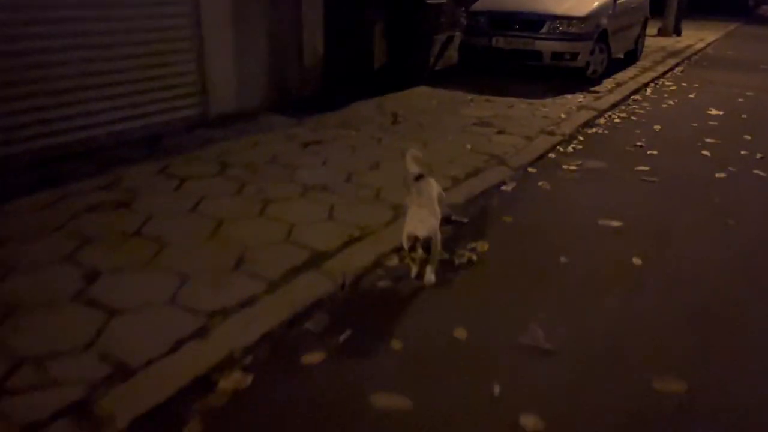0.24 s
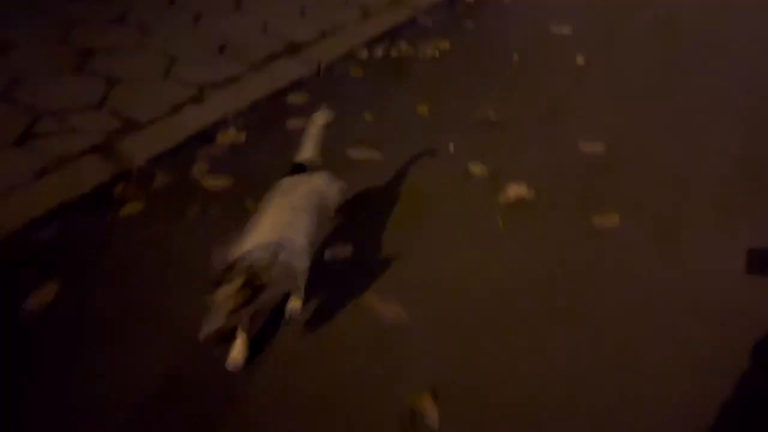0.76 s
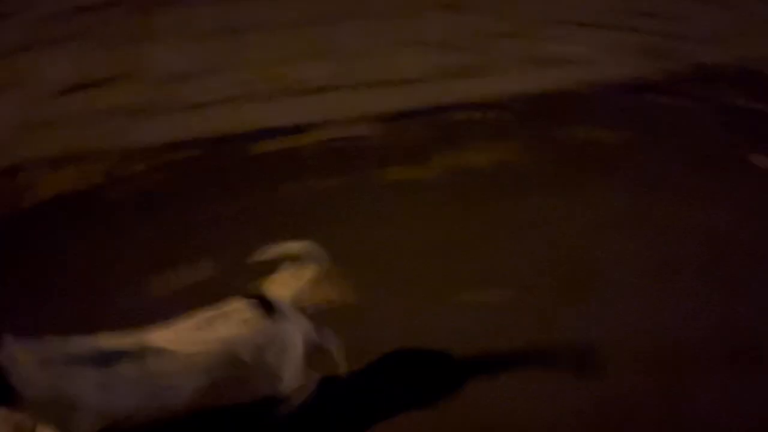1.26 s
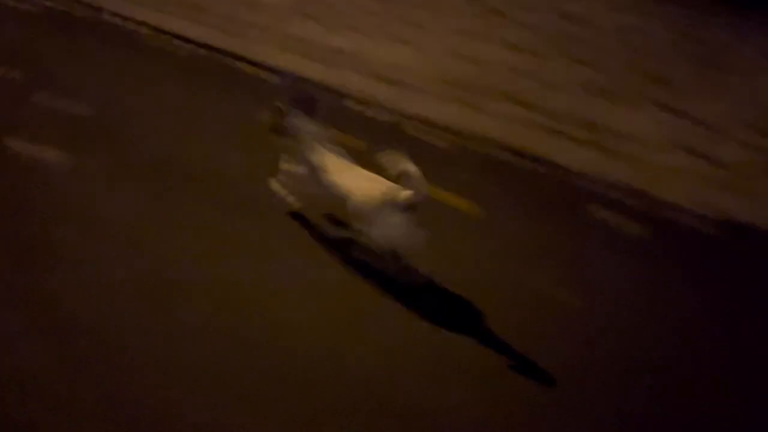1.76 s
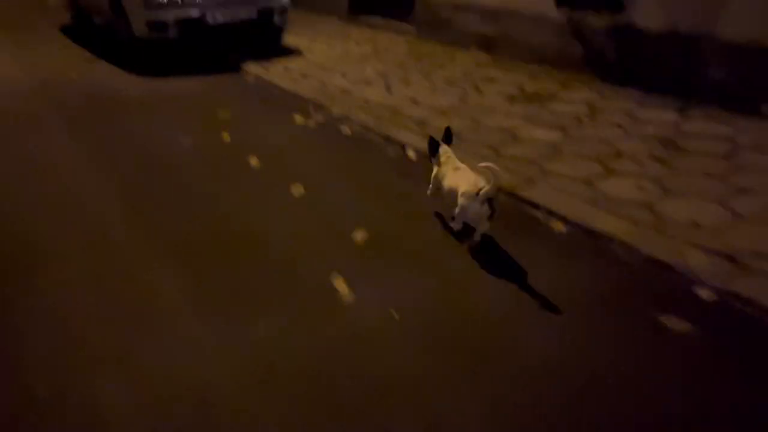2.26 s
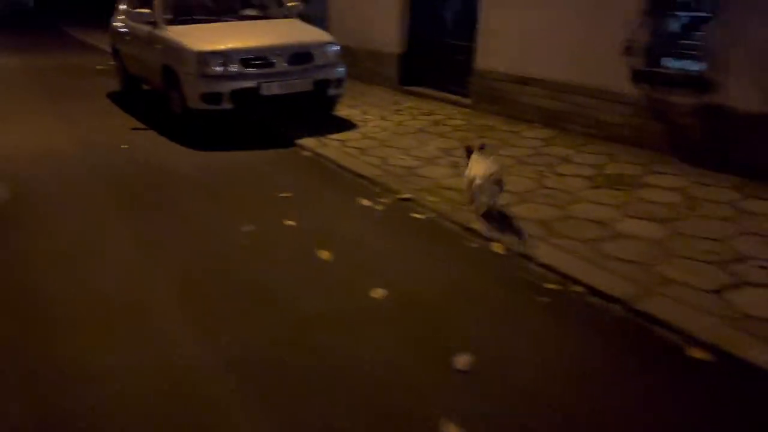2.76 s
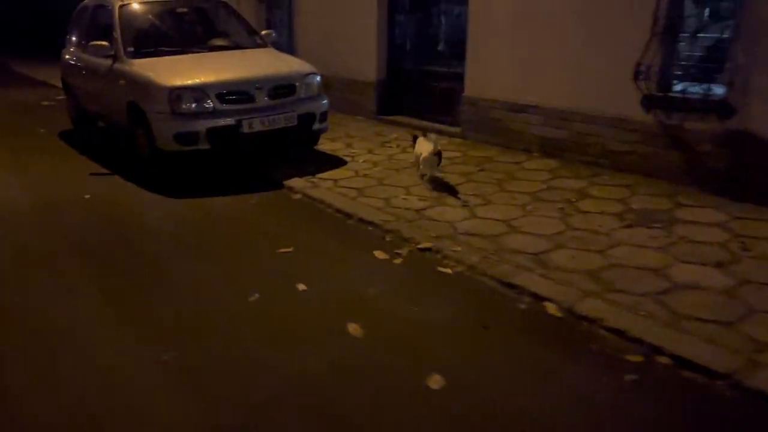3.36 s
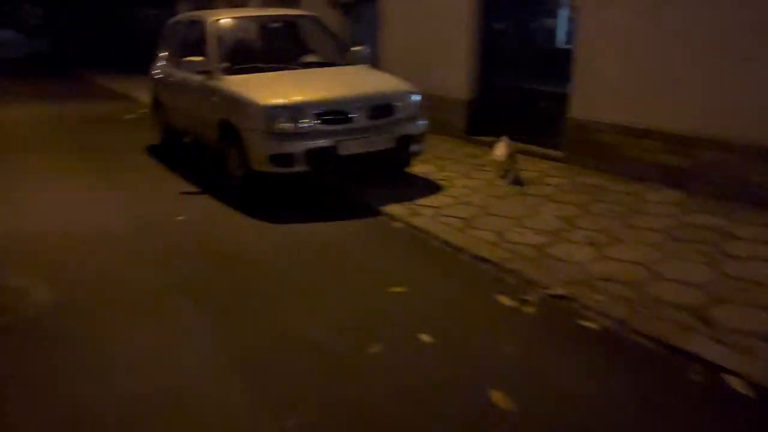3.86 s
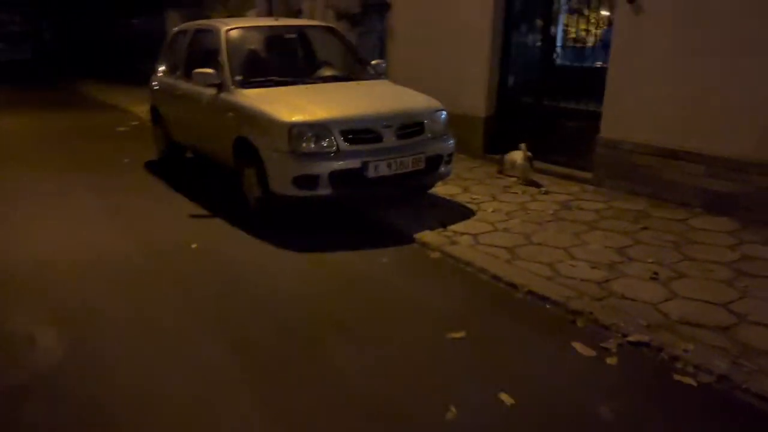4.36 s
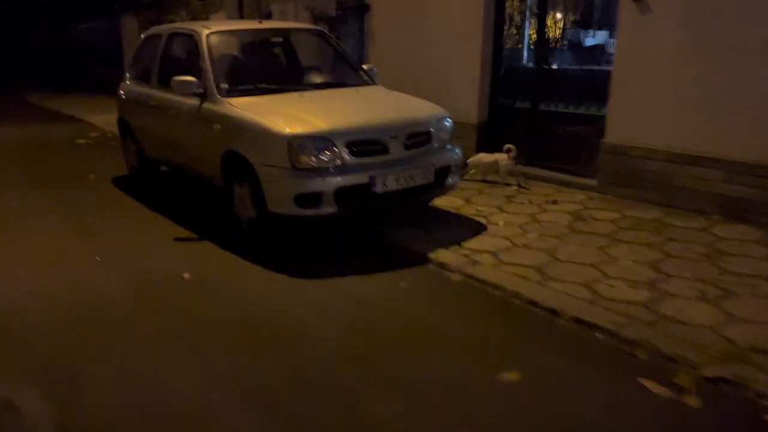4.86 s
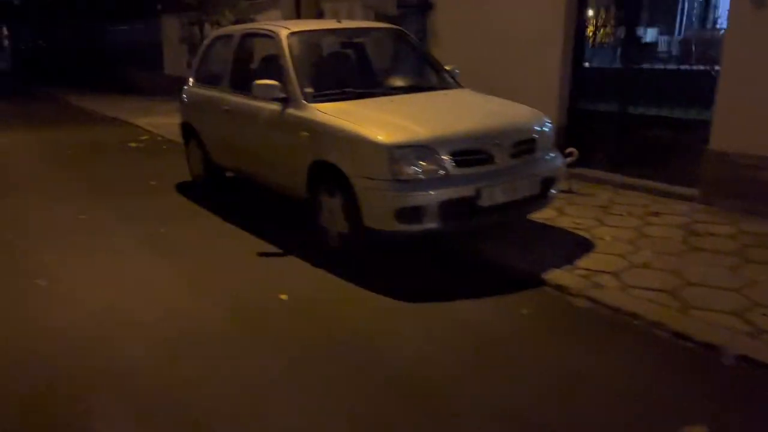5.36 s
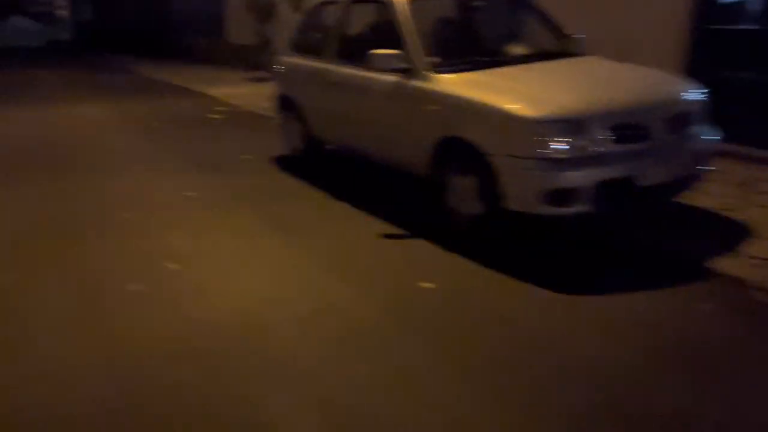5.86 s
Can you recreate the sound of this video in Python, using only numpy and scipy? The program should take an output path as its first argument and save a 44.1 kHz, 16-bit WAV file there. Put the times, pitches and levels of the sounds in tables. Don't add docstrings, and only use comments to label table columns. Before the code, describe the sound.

A quiet town street at night, heard through a handheld stereo microphone with faint low hush and breeze. From 0.2 s small claws tick lightly and very high on asphalt, with brief shoe scrapes at 0.3 and 0.9-1.0 s and soft jacket swishes that continue throughout. At about 1.4 s a distant dog starts baying: hoarse, nearly steady mid-pitched cries joined into runs, with echo off house fronts. A deep wind thump strikes at 1.55 s, followed by pebble crunch and a dull knock around 1.65-1.75 s. New baying runs begin near 2.5, 3.65, 4.6, 5.25 and 5.8 s, the fifth shriller. Claws thin out by 3.7 s; a softer knock falls at 2.9 s. A small plastic rattle at 4.7 s leads to a bright, sharp latch snap at 4.9 s. At 5.93 s the baying cuts off, leaving hush, breeze and faint cloth until 6.1 s.

```python
import sys
import numpy as np
from scipy import signal
from scipy.fft import rfft, irfft, next_fast_len
from scipy.io import wavfile
from scipy.ndimage import uniform_filter1d

SR = 44100
rng = np.random.default_rng(int(sys.argv[2]) if len(sys.argv) > 2 else 0)


def put_to_file(sound):
    columns = np.atleast_2d(sound).T
    safe = np.clip(columns, -1, 1)
    whole_steps = np.round(safe * 32767)
    wavfile.write(sys.argv[1], SR, whole_steps.astype(np.int16))


def field_ratio(decibels):
    return 10 ** (np.asarray(decibels, dtype=float) / 20)


N = 269803
STEP = 50
CUT_S = 5.935

# (frequency [Hz], time to fade by 60 dB [s])
STREET_FADE = [(300, .38), (700, .32), (2000, .3), (6000, .22)]

# (frequency [Hz], level [dB per Hz])
NIGHT_COLOUR = [(18, -20.5), (30, -46), (75, 4), (225, -2.5), (389, -10), (852, -11.5), (1050, -11.5),
                (1400, -14.5), (2690, -20), (2990, -21), (4910, -39.5), (13300, -36.5), (15500, -64)]
NIGHT_DB = -62
# (frequency [Hz], likeness [0-1])
NIGHT_LIKENESS = [(60, 0.49), (300, 0.95), (640, 0.31), (1200, 0.31), (2100, 1), (4000, 0.67), (7000, 0.34),
                  (12000, 0.65)]
# (frequency [Hz], lead of the right port [radians])
NIGHT_TURN = [(100, .1), (350, .3), (700, 1.1), (1200, 1.3), (2100, 2.1), (4000, 3.1), (7000, 3.),
              (10000, 5.9)]

# (frequency [Hz], level [dB per Hz])
GUST_COLOUR = [(12, -57), (20, -48), (36, -19.5), (62, 2), (95, -8), (174, -13.5), (253, -28.5), (300, -27),
               (390, -23.5), (660, -120)]
# (time [s], level [dB])
BREEZE = [(0., -62.5), (1.3, -54), (2.2, -74), (2.9, -62), (6.12, -53)]
# (start [s], hold [s], level [dB])
PUFFS = [
    (1.42, 0.025, -50),
    (1.55, 0.041, -27.5),
    (2.03, 0.018, -52),
    (4.6, 0.12, -58.5),
    (5.11, 0.038, -53),
]
PUFF_RISE_DB_PER_S, PUFF_FALL_DB_PER_S = 202, 159

# (frequency [Hz], level [dB per Hz])
CLOTH_COLOUR = [(710, -9), (1200, -6), (1440, -8), (2920, -16.5), (3310, -15.5), (4270, -16.5), (6940, -20),
                (12800, -30.5), (15000, -116)]
# (frequency [Hz], left minus right [dB])
CLOTH_LEAN = [(1000, 1), (2000, -1), (4000, 6), (7500, 11), (9000, 9), (10500, -1), (15000, -1)]
# (start [s], hold [s], level [dB])
STRIDES = [(.28, 0.023, -66.5), (.68, 0.12, -71.5), (1., 0.036, -71.5), (1.32, 0.021, -70),
           (1.42, 0.5, -70), (2.15, 0.24, -69.5), (2.6, 0.066, -73), (2.8, 0.056, -65), (3.2, 0.19, -65.5),
           (3.55, 0.072, -59), (3.76, 0.19, -64.5), (4.2, 0.063, -69.5), (4.44, 0.25, -66),
           (4.79, 0.072, -60.5), (5.05, 0.12, -64), (5.3, 0.18, -71.5), (5.69, 0.17, -67.5),
           (6.0, 0.18, -74.5)]
CLOTH_REST_DB, CLOTH_RISE_DB_PER_S, CLOTH_FALL_DB_PER_S, CLOTH_GROW_DB_PER_S = -73, 235, 268.5, 12
# (time [s], level [dB])
CLOTH_STILL = [(0., -7), (.2, 3), (.3, 1.3), (6.12, -0.8)]

# (start [s], hold [s], level [dB])
SCUFFS = [
    (0.307, 0.026, -49),
    (0.914, 0.0041, -54),
    (1.0206, 0.0066, -46),
    (0.254, .025, -55.5),
]
SCUFF_RISE_DB_PER_S, SCUFF_FALL_DB_PER_S = 369, 346
# (frequency [Hz], level [dB per Hz])
SCUFF_COLOURS = [
    [(410, -80.5), (700, -44), (809, -19), (1020, -40), (1280, 0), (2140, 8.5), (2700, -12), (4280, -5),
     (7000, -33), (9100, -65), (15400, -120)],
    [(410, -41), (700, -19), (874, -8), (1270, 2), (1700, -12), (2220, 0), (7000, -39), (9100, -64),
     (15400, -120)],
    [(290, -54), (500, -40), (637, -46), (800, 14), (1250, -11), (1850, 3), (2500, -2), (3200, 2),
     (4400, -2.5), (7000, -23), (9100, -69), (15400, -120)],
]
# (start [s], length [s], first pitch [Hz],
# last pitch [Hz], level [dB])
SOLE_CHIRP = (6, -0.2, 10402, 9000, -65)

# (time [s], peak [dB], ring [Hz], left minus right [dB])
CLAWS = [(.18, -59, 10000, 0), (.216, -54, 10500, 0), (0.2972, -44.5, 11000, -5), (.838, -55, 11500, -6),
         (1.325, -54, 11000, -3), (0.504, -43, 12900, 0.5), (0.5132, -34.5, 12500, 6),
         (0.7086, -40.5, 10200, 5), (0.7802, -37, 11600, 5), (0.9916, -37.5, 10800, -6),
         (1.07, -38.5, 13000, -11), (1.13, -50, 9900, -6), (1.2054, -47.5, 11600, 5),
         (1.27, -33, 11500, -5), (1.3415, -46, 11400, -6), (1.5443, -41, 10100, 4), (1.561, -52, 11100, -4),
         (1.5997, -44, 9800, 4), (1.626, -43, 11200, -10), (1.8043, -60, 10400, -8),
         (1.8928, -45.5, 10400, 4), (1.061, -39, 12400, 6), (2.1646, -41, 11100, 4),
         (2.2228, -48, 11600, -4), (2.4225, -46, 12200, -11), (2.47, -50, 11200, -7),
         (2.6894, -40, 11400, 5), (2.7701, -44, 11200, -4), (2.8634, -43.5, 10500, -6),
         (2.9931, -45, 12900, 17), (3.0624, -50.5, 10500, 11), (3.288, -42.5, 11600, -6),
         (3.4744, -51, 8100, 7), (3.7274, -53, 7000, -2)]
# (time [s], peak [dB], ring [Hz], left minus right [dB])
GRIT = [(.408, -52, 1500, 0), (.548, -52, 1300, 0), (.566, -51, 1800, 0), (.709, -47, 4000, 3),
        (1.272, -40, 3300, 8), (1.585, -38, 1800, 3), (1.6425, -30, 1600, 6), (1.644, -35, 2900, 6),
        (1.645, -38, 4500, 6), (1.718, -42, 2000, 3), (2.165, -45, 2600, 3), (2.4224, -53, 3500, 3),
        (2.806, -41, 1500, 7), (2.838, -39, 1500, 8), (2.839, -41, 3300, 8), (2.84, -46, 5200, 8),
        (2.884, -41, 2000, 4), (3.5044, -47, 3160, 2), (3.5748, -43, 3320, 7), (5.196, -50, 2200, 0),
        (5.2144, -45, 1800, 0), (5.428, -47, 3300, 2), (5.482, -47, 3300, 2), (5.679, -43, 3900, 4),
        (1.643, -33, 1300, 6)]
# (time [s], peak [dB], ring [Hz], left minus right [dB])
KNOCKS = [
    (1.726, -30.5, 402, -4),
    (2.884, -40, 324, 8),
]

# (time [s], low ring [dB], high ring [dB], edge [dB], pitch factor)
LATCH_SLIPS = [(4.6865, -34, -18, -30, .77), (4.6878, -30, -18, -16, .77), (4.6888, -18, -11, -24, .74),
               (4.6931, -19, -13, -34, .75), (4.6955, -40, -20, -40, .77), (4.6972, -34, -12, -36, .75),
               (4.699, -40, -19, -44, .75), (4.7013, -36, -17, -40, .8), (4.7045, -40, -24, -50, .8),
               (4.7125, -44, -23, -44, .82), (4.715, -44, -27, -50, .82), (4.8936, -45, -23, -24, 1.),
               (4.897, -26, -30, -34, 1.2), (4.8989, -9, 5, 0, 1.), (4.9001, -11, 0, -12, 1.),
               (4.9013, -12, 4, -10, 1.02), (4.903, -10, -1, -13, .95), (4.9046, -13, -7, -20, .85),
               (4.906, -6, 13, -9, .99), (4.9085, -24, -10, -24, 1.1), (4.912, -26, -18, -28, 1.12),
               (4.9157, -34, -19, -30, 1.), (4.928, -60, -36, -30, 1.)]
# (frequency [Hz], width [Hz], level [dB])
LATCH_LOW = [(1145, 500, -10), (1660, 350, -5), (2070, 300, -1), (2360, 170, -16)]
# (frequency [Hz], width [Hz], level [dB])
LATCH_HIGH = [(4500, 500, -17), (5600, 700, 1)]
# (frequency [Hz], width [Hz], level [dB])
LATCH_EDGE = [(6900, 900, -9), (8600, 1100, -7), (11800, 1800, -19)]

# (start [s], mouth whistle [Hz], bright overtones [dB],
# shrill band [dB], lift of the third overtone in the first breath [share of pitch])
RUNS = [
    (1.36, 1017, -12, -5, 0.54),
    (2.53, 1008, -14.5, -7.5, 0.012),
    (3.65, 1009, -12.5, -13, -0.088),
    (4.6, 1077, -12, -22, 0.11),
    (5.25, 1136, -10, -1, 0.27),
    (5.77, 1074, -11, -6.5, -0.062),
]
# (start [s], hold [s], effort [dB], top pitch [Hz], mouth opening [dB])
BARKS = [(1.405, 0.1, -37.5, 695, -3.5), (1.588, 0.17, -39, 662, -4), (1.793, 0.095, -42, 645, -16.5),
         (1.936, 0.076, -40.5, 628, -19), (2.049, 0.025, -48, 610, -1.5), (2.125, 0.078, -39, 638, -31),
         (2.235, 0.029, -56, 643, -30.5), (2.366, 0.019, -56.5, 662, -23),
         (2.574, 0.032, -38.5, 650, -13.5), (2.606, 0.13, -38, 725, -3.5), (2.786, 0.053, -42, 665, -2),
         (2.863, 0.075, -40, 674, -10), (3.008, 0.037, -44, 651, 0.5), (3.087, 0.052, -40.5, 658, -11),
         (3.223, 0.083, -40.5, 632, -11.5), (3.362, 0.013, -57, 614, 18), (3.68, 0.023, -45, 693, -14),
         (3.725, 0.083, -43, 710, 1), (3.859, 0.031, -52, 750, -5.5), (3.983, 0.058, -44, 723, -2),
         (4.067, .07, -44.5, 648, -10), (4.208, 0.024, -47.5, 672, -5), (4.257, 0.083, -48.5, 654, -4.5),
         (4.402, 0.043, -58, 651, -13.5), (4.638, 0.2, -43, 677, -7), (4.921, 0.062, -46, 650, -6.5),
         (4.969, 0.11, -45, 678, -9), (5.289, 0.19, -44, 676, -7), (5.521, 0.023, -55, 680, -13.5),
         (5.604, 0.12, -67.5, 673, -11), (5.807, 0.19, -46, 666, -2.5)]
BARK_RISE_DB_PER_S, BARK_FALL_DB_PER_S, BARK_SAG_DB_PER_S = 670, 86, 30
LINKED_RISE_DB_PER_S = 265
TIRING_PER_S = 0.086
CLOSE_DB = 0.5
MOUTH_END_DROP_DB, EFFORT_ARCH_DB = -3.5, 7
ARCH, END_SAG = 0.15, 0.46
WHISTLE_ARCH_HZ = 144
BRIGHT_PER_MOUTH = 0.8
HOARSE_OPEN, HOARSE_PER_DB, HOARSE_PER_S = .95, .045, .05
SHRILL_S = 0.17
WOBBLE = 0.022
# (multiple of the pitch, level [dB])
OVERTONES = [(2, 6), (4, -16), (5, -14)]
# (start [s], hold [s], level [dB], pitch [Hz])
SQUEAKS = [
    (1.392, .03, -51.5, 1307),
    (1.946, 0.091, -65, 1226),
    (5.258, 0.039, -57, 1337),
    (5.79, 0.08, -56.5, 1333),
]
SQUEAK_RISE_DB_PER_S, SQUEAK_FALL_DB_PER_S = 800, 113
# (time [s], change [dB], length [s])
SURGES = [(1.521, 3.5, 0.0059), (1.587, 0, 0.0052), (1.718, 4, 0.0088), (1.79, 3.5, .008),
          (1.876, 3.5, 0.031), (1.966, 3, 0.014), (2.056, -3.5, 0.016), (2.14, 0, .025),
          (2.193, -3.5, 0.013), (2.346, -10, 0.016), (2.472, -9, 0.025), (2.537, -16, 0.018),
          (2.572, 5.5, 0.0081), (2.61, 0.5, 0.0066), (2.78, -1, 0.01), (2.823, -9.5, 0.0072),
          (2.887, 2, 0.015), (3.008, 3, 0.0069), (3.08, 10, .008), (3.145, 4.5, 0.0072), (3.166, -2, 0.014),
          (3.206, 3.5, 0.012), (3.291, 7, 0.0056), (3.44, -3, 0.03), (3.678, 6, 0.0067), (3.73, 2, .01),
          (3.796, 2, .008), (4.069, 4.5, 0.0056), (4.214, 4, 0.0082), (4.283, 4.5, .014), (4.373, 2, .01),
          (4.42, 2, 0.024), (5.797, 3, 0.009)]
LINGER_S, LINGER_SHARE = 0.031, 1
# (frequency [Hz], lead of the right port [radians])
DOG_TURN = [(350, 1.4), (600, 2.4), (750, 2.6), (1200, 2.7), (2000, 3.1), (4000, 3.3)]
# (frequency [Hz], left minus right [dB])
DOG_LEAN = [(350, 2), (650, 1.5), (1200, 2), (2000, -2), (4000, 5)]
# (frequency [Hz], level [dB])
DOG_DIRECT = [(350, -3), (600, 2), (800, 2), (1100, -4), (1500, -3), (2100, 0), (4000, -4)]


def evened(x):
    return x / np.sqrt(np.mean(x ** 2) + 1e-20)


def read(points, hz):
    f, value = np.transpose(points)
    return np.interp(np.log(hz + 1), np.log(f + 1), value)


def curve(rows):
    s, value = np.transpose(rows)
    return np.interp(np.arange(N) / SR, s, value)


def control_times():
    return np.arange(0, N, STEP) / SR


def fine(control):
    return np.interp(np.arange(N), np.arange(0, N, STEP), control)


def swells(rows, rise_db_per_s, fall_db_per_s, grow_db_per_s=0.):
    start, hold, db = np.transpose(rows)[:3, :, None]
    t = control_times() - start
    rise = rise_db_per_s * np.minimum(t, 0)
    drift = grow_db_per_s * np.clip(t, 0, hold)
    fall = fall_db_per_s * np.maximum(t - hold, 0)
    return field_ratio(db + rise + drift - fall)


def together(gains):
    return fine(np.sqrt((gains ** 2).sum(0)))


def add(mix, s, sound):
    part = mix[:, round(s * SR):][:, :sound.shape[1]]
    part += sound[:, :part.shape[1]]


def panned(x, pan_db):
    return np.array([x * field_ratio(pan_db / 2), x * field_ratio(-pan_db / 2)])


def ports(left, right, turn, lean):
    return np.array([left * field_ratio(lean / 2), right * field_ratio(-lean / 2) * np.exp(1j * turn)])


def resonate(x, hz, width, order=1):
    turn = np.exp(2j * np.pi * np.cumsum(hz * np.ones(len(x))) / SR)
    r = np.exp(-np.pi * width / SR)
    slow = signal.sosfilt([[1 - r, 0, 0, 1, -r, 0]] * order, x * turn.conj() + 1e-18)
    return 2 * (turn * slow).real


def noise(colour, same, patchy_db, size, count=N, turn=((1, 0), (2, 0)), lean=((1, 0), (2, 0))):
    frames, hz = 4 * count // size + 5, np.fft.rfftfreq(size, 1 / SR)
    a, b, c, d, patches = rng.standard_normal((frames, len(hz), 5)).T
    patches = uniform_filter1d(patches, size=10, axis=0)
    patches = evened(uniform_filter1d(patches, size=8, axis=1))
    like = np.clip(read(same, hz), -1, 1)[:, None]
    left = a + 1j * b
    right = like * left + np.sqrt(1 - like ** 2) * (c + 1j * d)
    z = ports(left, right, read(turn, hz)[:, None], read(lean, hz)[:, None])
    z *= field_ratio(read(colour, hz)[:, None] + patchy_db * patches)
    x = signal.istft(z, nperseg=size, noverlap=size * 3 // 4)[1][:, :count]
    return x / np.sqrt(np.mean(x.mean(0) ** 2))


def street(x):
    taps = np.zeros((3, SR))
    at = np.arange(0, SR - 20, 20) + rng.integers(0, 20, (3, SR // 20 - 1))
    np.put_along_axis(taps, at, rng.choice([-1., 1.], at.shape), 1)
    hz, t, z = signal.stft(taps, SR, nperseg=256)
    fade = field_ratio(-60 * t / read(STREET_FADE, hz)[:, None])
    tail = signal.istft(z * fade, SR, nperseg=256)[1]
    return signal.fftconvolve(x[None], tail / np.linalg.norm(tail[0]), axes=1)[:, :N]


def night():
    return field_ratio(NIGHT_DB + 3.0) * noise(NIGHT_COLOUR, NIGHT_LIKENESS, patchy_db=1.5, size=1024, turn=NIGHT_TURN)


def gust():
    wind = noise(GUST_COLOUR, [(20, 0.14), (300, 0.55)], patchy_db=3.0, size=2048)
    wind += 0.5 * np.array([resonate(port, 99, 9.9) for port in wind])
    steady = wind / (uniform_filter1d(wind.mean(0) ** 2, size=4000) + .05) ** .35
    puffs = together(swells(PUFFS, PUFF_RISE_DB_PER_S, PUFF_FALL_DB_PER_S))
    return np.hypot(field_ratio(curve(BREEZE)), puffs) * evened(steady)


def jacket():
    likeness = [(1000, 0.07), (4000, -0.16), (8000, -0.2), (11000, 0.6)]
    cloth = noise(CLOTH_COLOUR, likeness, patchy_db=2.0, size=256, lean=CLOTH_LEAN)
    swings = together(swells(STRIDES, CLOTH_RISE_DB_PER_S, CLOTH_FALL_DB_PER_S, CLOTH_GROW_DB_PER_S))
    rest = field_ratio(CLOTH_REST_DB + curve(CLOTH_STILL))
    return field_ratio(8.5) * np.hypot(rest, swings) * cloth


def shoes():
    out, count = np.zeros((2, N)), N // 4
    gains = swells(SCUFFS, SCUFF_RISE_DB_PER_S, SCUFF_FALL_DB_PER_S)
    colours = SCUFF_COLOURS + SCUFF_COLOURS[:1]
    for gain, colour in zip(gains, colours):
        scrape = noise(colour, [(500, 0.31), (7000, 0.16)], patchy_db=4.0, size=256, count=count)
        add(out, 0, fine(gain)[:count] * scrape)
    return out


def sole_chirp():
    start, length, first_hz, last_hz, db = SOLE_CHIRP
    out, place = np.zeros((2, N)), np.arange(0, length, 1 / SR) / length
    hz = first_hz + (last_hz - first_hz) * place ** 1.3
    tone = np.sin(np.pi * place) * np.sin(2 * np.pi * np.cumsum(hz) / SR)
    add(out, start, panned(field_ratio(db) * tone, pan_db=2.5))
    return out


def ticks(events, width_hz, crack_s, tail_s, tail_db, rise_s=1e-4, skirt=2):
    out, t = np.zeros((2, N)), np.arange(1500) / SR
    rise = np.minimum(t / rise_s, 1) ** 2
    fade = np.exp(-np.maximum(t - rise_s, 0) / crack_s) + field_ratio(tail_db) * np.exp(-t / tail_s)
    for (s, db, hz, pan_db), air in zip(events, rng.standard_normal((len(events), len(t)))):
        crack = resonate(air * rise * fade, hz, width_hz)
        crack = np.diff(resonate(crack, hz, skirt * width_hz), prepend=0)
        crack = resonate(crack, hz, 2 * skirt * width_hz)
        crack = field_ratio(db) * crack / abs(crack).max()
        add(out, s - rise_s / 4, panned(crack, np.clip(pan_db, -8, 8)))
    return out


def claws():
    return ticks(CLAWS, width_hz=5000, crack_s=0.0012, tail_s=0.006, tail_db=-24, rise_s=.003)


def grit():
    out = ticks(GRIT, width_hz=1200, crack_s=.0015, tail_s=.006, tail_db=-14, rise_s=.001, skirt=1.2)
    out[1] = np.roll(out[1], 2)
    return out


def knocks():
    return ticks(KNOCKS, width_hz=163, crack_s=0.0059, tail_s=0.024, tail_db=4)


def plastic_ring(modes, pitch, rise_s):
    t = np.arange(1500) / SR
    rings = sum(field_ratio(db) * np.exp(-np.pi * width * t) * np.sin(2 * np.pi * pitch * hz * t)
                for hz, width, db in modes)
    return (1 - np.exp(-t / rise_s)) ** 2 * rings


def latch():
    out, t = np.zeros((2, N)), np.arange(1500) / SR
    for (s, low_db, high_db, edge_db, pitch), air in zip(
            LATCH_SLIPS, rng.standard_normal((len(LATCH_SLIPS), len(t)))):
        chatter = field_ratio(-28) * air * np.exp(-t / .003) + (t == 0)
        low = np.convolve(plastic_ring(LATCH_LOW, pitch, .0003), chatter)
        high = np.convolve(plastic_ring(LATCH_HIGH, pitch, .0005), chatter)
        edge = np.convolve(plastic_ring(LATCH_EDGE, 1, .0003), chatter)
        snap = field_ratio(low_db + 4) * np.outer([1, 1.05], low)
        snap += field_ratio(high_db) * np.outer([1, .07], high)
        snap += field_ratio(edge_db) * np.array([edge, 1.2 * np.roll(edge, 1)])
        add(out, s, snap)
    return out + field_ratio(-29.5) * street(out[0])[:2]


def throat_controls():
    start, hold, _, top_hz, open_db = np.transpose(BARKS)[:, :, None]
    run_s, whistle_hz, run_db, shrill_db, lift = np.transpose(RUNS)
    first = np.diff(np.searchsorted(run_s, start), prepend=0, axis=0) > 0
    age = start - run_s[0]
    place = (control_times() - start) / hold
    shut = np.clip(abs(place - .5) / 0.62, 0, 1) ** 2
    hoarse = np.clip(HOARSE_OPEN + HOARSE_PER_DB * open_db + HOARSE_PER_S * age, .2, .88)

    rise = np.where(first, BARK_RISE_DB_PER_S / (1 + TIRING_PER_S * age), LINKED_RISE_DB_PER_S)
    gains = swells(BARKS, rise, BARK_FALL_DB_PER_S, -BARK_SAG_DB_PER_S)
    gains = gains * field_ratio(-EFFORT_ARCH_DB * hoarse * shut - CLOSE_DB * np.clip(place - 1, 0, 9) ** 2)

    def lead(value):
        return fine((gains ** 2 * value).sum(0) / ((gains ** 2).sum(0) + 1e-300))

    hz = lead(top_hz * (1 - ARCH * hoarse * shut * np.where(place > .5, END_SAG, 1)))
    mouth_db = lead(open_db - MOUTH_END_DROP_DB * shut)
    hoarse, shut = lead(hoarse), lead(shut)

    t = np.arange(N) / SR
    run = np.maximum(np.searchsorted(run_s, t) - 1, 0)
    breath = np.exp(-(np.maximum(t - run_s[run], 0) / SHRILL_S) ** 2)
    bright_db = run_db[run] + BRIGHT_PER_MOUTH * mouth_db
    mouth_hz = whistle_hz[run] + WHISTLE_ARCH_HZ * (1 - shut)
    third_hz = hz * (3 + lift[run] * breath)
    shrill = field_ratio(shrill_db[run]) * breath
    return together(gains), mouth_db, bright_db, hz, mouth_hz, third_hz, hoarse, shrill


def surges():
    s, db, length = np.transpose(SURGES)[:, :, None]
    bells = np.exp(-((control_times() - s) / length) ** 2)
    return field_ratio(fine((db * bells).sum(0)))


def held(pair, push):
    keep = np.exp(-1 / (LINGER_S * SR))
    due = push ** 2 + LINGER_SHARE * signal.lfilter([1 - keep], [1, -keep], push ** 2)
    power = abs(uniform_filter1d(pair.mean(0) ** 2, size=900))
    ratio = (power / power.mean() + 1e-4) / (due / due.mean() + 1e-4)
    return pair * np.clip(ratio, .25, 8) ** -.35


def steady(x):
    return evened(x / (uniform_filter1d(x ** 2, size=600) + .1) ** .3)


def far_dog():
    effort, mouth_db, bright_db, hz, mouth_hz, third_hz, hoarse, shrill = throat_controls()
    air, flutter = rng.standard_normal((2, N))
    hz = hz * (1 + WOBBLE * hoarse * evened(resonate(flutter, 13.4, 28)))
    rasp = air * field_ratio(3. * evened(resonate(flutter, 80, 90)))
    clear = np.sqrt(1 - hoarse ** 2)
    tone_width = 50

    def line(hz, width):
        return evened(resonate(air, hz, width, order=3))

    def rough(hz, width):
        return evened(resonate(rasp, hz, width, order=3))

    def band(low_hz, high_hz):
        sos = signal.butter(N=3, Wn=[low_hz, high_hz], btype="band", fs=SR, output="sos")
        return evened(signal.sosfilt(sos, rasp))

    chest = 0.12 * band(207.5, 388)
    hoarse_throat = 0.93 * line(hz + 10, 193) + 0.41 * rough(hz * 1.02, 287) + chest
    throat = clear * steady(line(hz, tone_width)) + hoarse * hoarse_throat

    mouth = .7 * clear * line(mouth_hz, 90) + .9 * hoarse * line(mouth_hz - 30, 200)
    mouth += .65 * rough(mouth_hz - 130, 520)

    breaks = field_ratio(2. * evened(resonate(flutter, 6, 14)))
    upper = breaks * sum(field_ratio(db) * steady(line(k * hz, 1.6 * tone_width)) for k, db in OVERTONES)
    third = breaks * steady(line(third_hz, 3.2 * tone_width))
    rough_top = .7 * line(third_hz, 600) + .6 * band(1650, 2350)
    rough_top += shrill * (.6 * band(3500, 4300) + .8 * line(4030, 350))
    bright = field_ratio(-3.5 - 0.15 * mouth_db) * (clear ** 6 * upper + clear ** 2 * third) + hoarse * rough_top

    voice = effort * (throat + field_ratio(mouth_db) * mouth + field_ratio(bright_db) * bright)
    squeaks = swells(SQUEAKS, SQUEAK_RISE_DB_PER_S, SQUEAK_FALL_DB_PER_S)
    squeak_hz = fine(np.array(SQUEAKS)[squeaks.argmax(0), -1])
    voice += together(squeaks) * line(squeak_hz, 165)
    voice *= np.arange(N) > RUNS[0][0] * SR

    shared, left, right = street(voice)
    size = next_fast_len(N)
    bins_hz = np.fft.rfftfreq(size, 1 / SR)
    direct = rfft(0.49 * voice + 0.4 * shared, size) * field_ratio(read(DOG_DIRECT, bins_hz))
    pair = ports(direct, direct, read(DOG_TURN, bins_hz), read(DOG_LEAN, bins_hz))
    pair = irfft(pair, size)[:, :N] + .55 * np.array([1.05 * left, .95 * right])
    pair = held(pair, effort * np.hypot(1, field_ratio(mouth_db)))
    return field_ratio(11.0) * surges() * pair * (np.arange(N) < CUT_S * SR)


def scene():
    around = night() + gust()
    walker = jacket() + shoes() + sole_chirp() + grit() + knocks()
    return around + walker + claws() + latch() + far_dog()


def low_pass(x):
    return signal.sosfilt(signal.butter(12, 16510, fs=SR, output="sos"), x)


def record(dry):
    soft = signal.sosfilt(signal.butter(N=8, Wn=15000, fs=SR, output="sos"), dry)
    return low_pass(soft)


dry = scene()
out = record(dry)
put_to_file(out)
```